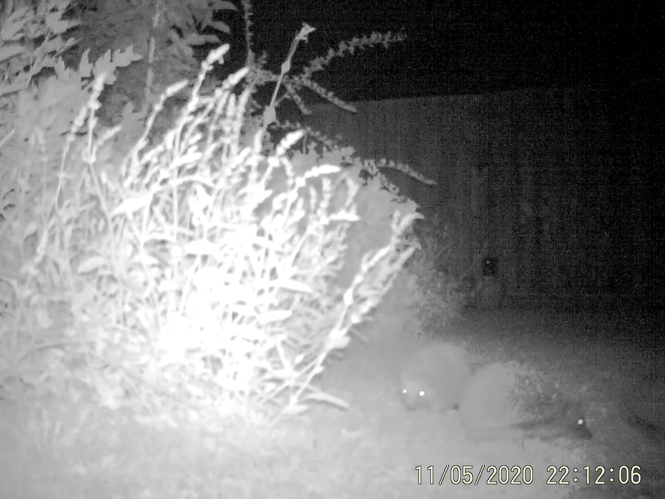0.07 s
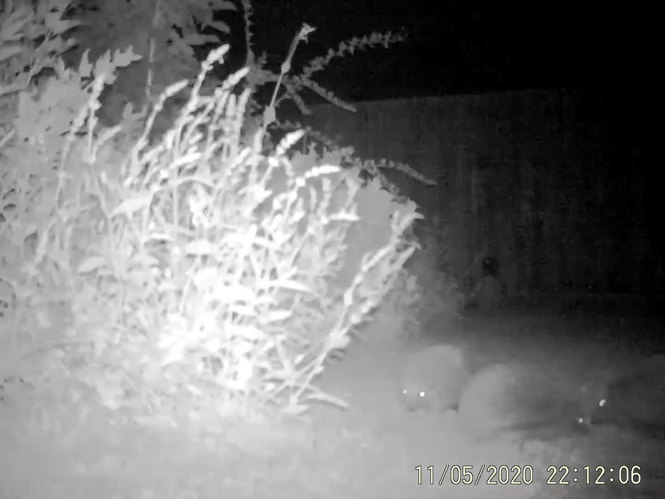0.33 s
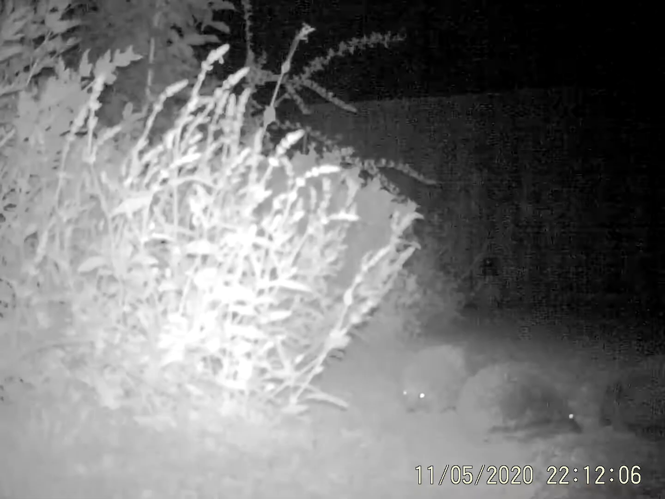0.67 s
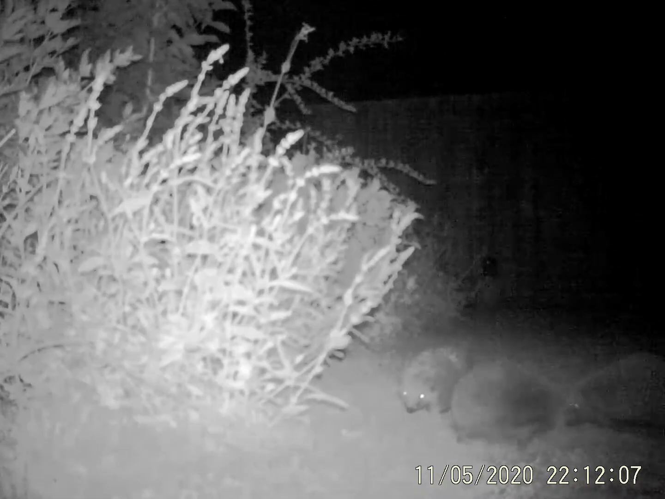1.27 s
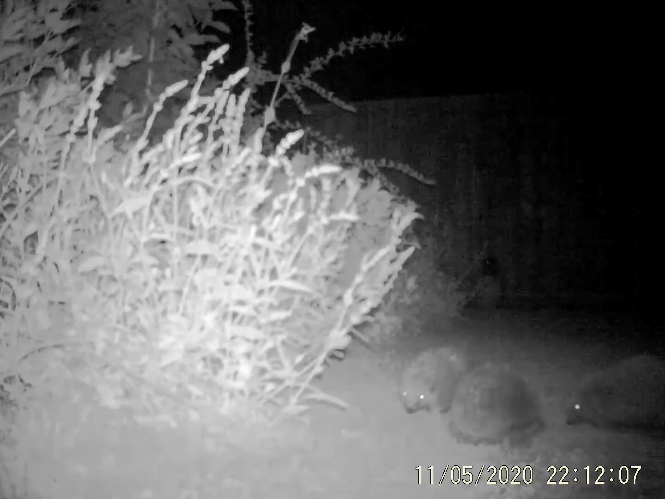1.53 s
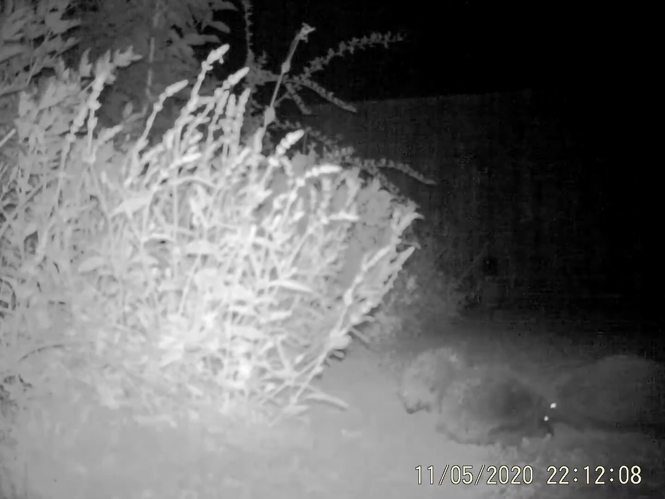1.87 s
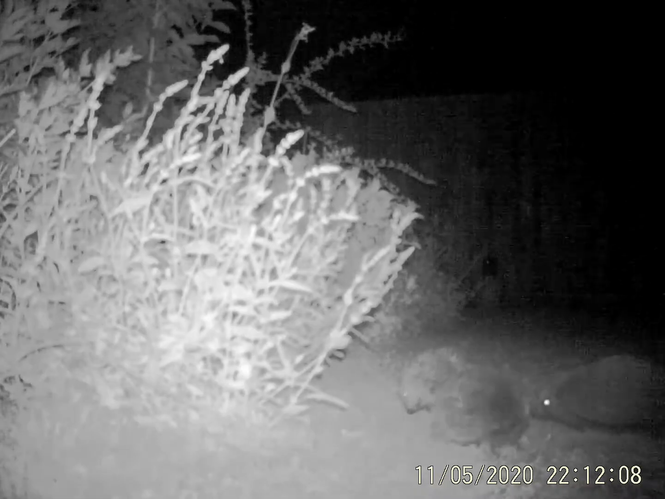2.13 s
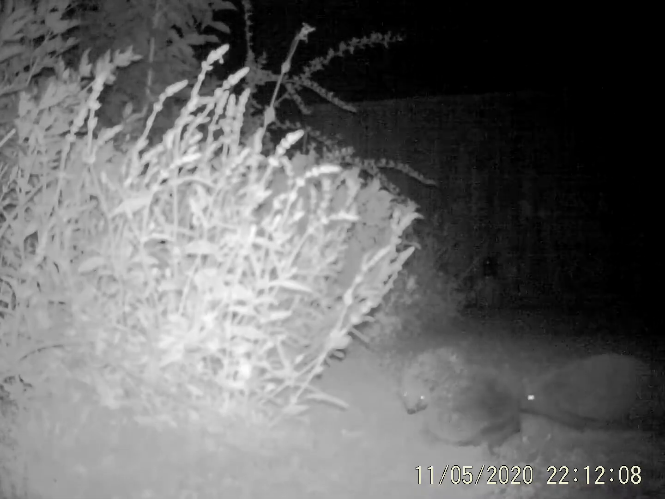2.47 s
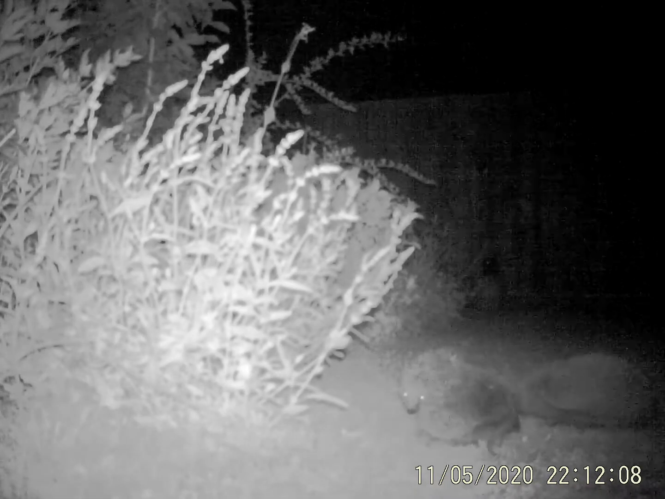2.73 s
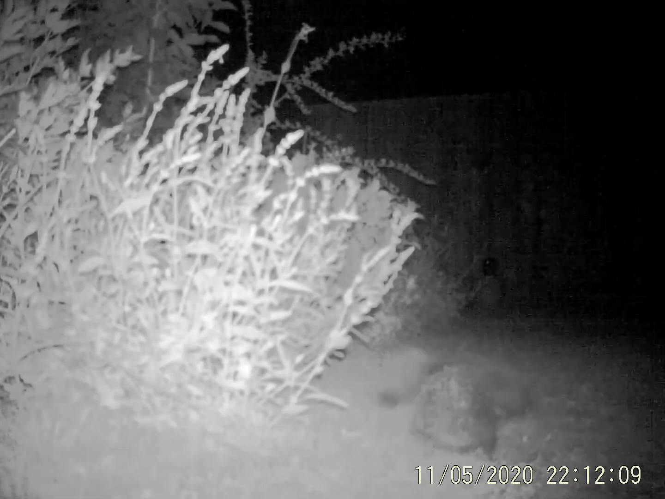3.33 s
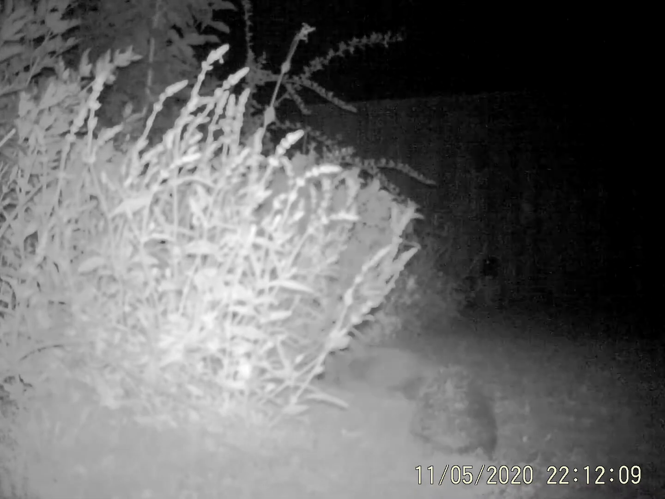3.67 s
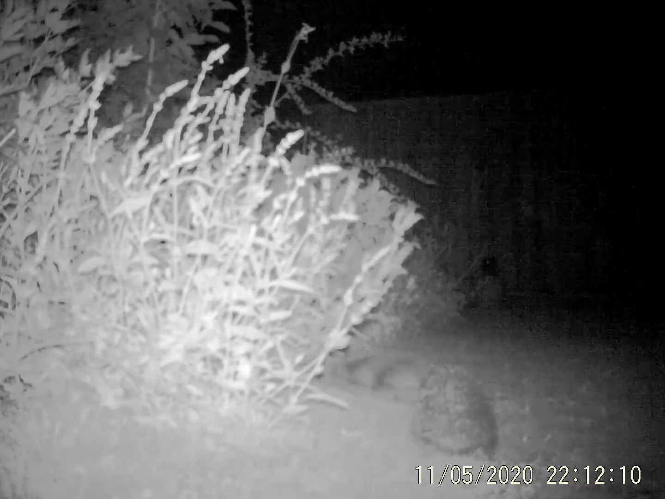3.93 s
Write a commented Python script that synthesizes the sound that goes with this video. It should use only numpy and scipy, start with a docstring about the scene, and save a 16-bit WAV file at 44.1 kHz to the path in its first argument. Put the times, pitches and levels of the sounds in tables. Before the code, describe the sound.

Soft, breathy hedgehog huffs repeat evenly in a night garden, a few metres from a microphone that starts with a pop and keeps hissing. Near the end the animals shuffle away with light scuffs and dull little steps.

```python
"""A pop, then steady hiss: a mono microphone switches on beside a garden path at night.
A few metres off, hedgehogs circle each other. One huffs about three times a second: turbulent air
excites its airway to a hollow puff and its nostrils to a thin hiss, at times with a whistle.
Then they shuffle off with faint scuffs and footfalls. Fence and paving return a short echo."""
import sys
import numpy as np
from scipy import signal
from scipy.fft import rfft, irfft, next_fast_len
from scipy.io import wavfile
from scipy.ndimage import map_coordinates

SR = 44100
rng = np.random.default_rng(int(sys.argv[2]) if len(sys.argv) > 2 else 0)


def persist_wave(psi):
    """Save psi, clipped to +-1, as 16-bit WAV."""
    counts = np.round(np.clip(psi, -1, 1) * 32767).astype(np.int16)
    wavfile.write(sys.argv[1], SR, np.atleast_2d(counts).T)


N = 176400

# Huffs: t/s, duration/s, puff level/dB, nasal level/dB, main resonance f/Hz, low-resonance gain/dB
HUFF_EVENTS = [(0.014, 0.083, -58, -65.5, 1000, -3), (0.251, 0.075, -55.5, -66.5, 930, 2),
               (0.573, 0.11, -58.5, -67.5, 1030, -5), (0.838, 0.074, -58.5, -63, 950, -2),
               (1.193, 0.096, -58, -67, 920, -2), (1.601, 0.092, -58.5, -66.5, 900, 2),
               (1.931, 0.098, -56.5, -67, 930, -3), (2.223, 0.1, -57, -71, 925, 1),
               (2.504, 0.064, -57.5, -66.5, 900, 4), (2.81, 0.096, -57.7, -68.5, 960, 2),
               (3.162, 0.094, -58, -68, 1020, -1)]
# Airway resonances: f/(main resonance f), bandwidth/Hz, relative level/dB
AIRWAY_MODES = [(.44, 169, 7.5), (.6, 200, -8), (.83, 220, 2.5), (1.04, 252, 6), (1.35, 400, -29)]
# Nostril resonances: f/Hz, bandwidth/Hz, relative level/dB
NOSTRIL_MODES = [(3200, 870, -5.5), (4100, 520, -8), (5160, 1100, -5.5), (6100, 1200, -6),
                 (8800, 3600, -18)]
# Nostril whistles: t/s, duration/s, level/dB, initial f/Hz, final f/Hz
WHISTLE_EVENTS = [(.61, .055, -71, 5190, 5290), (.865, .042, -72, 5220, 4970),
                  (1.645, 0.038, -70, 5000, 4900), (2.262, .054, -66.5, 5420, 5020),
                  (2.813, 0.046, -70, 5500, 5180), (2.87, 0.035, -70, 4520, 4350)]
# Paws landing on the path: t/s, level/dB
FOOTFALL_EVENTS = [(3.376, -56), (3.44, -59), (3.465, -50), (3.599, -49), (3.616, -47)]
# Modes of a paw's knock: mean f/Hz, relative level/dB, T60/s
KNOCK_MODES = [(230, -6, .03), (386, -8, .028), (566, -4, .025)]
# Feet scuffing the ground: t/s, duration/s, level/dB
SCUFF_EVENTS = [(1.506, 0.026, -61), (2.413, 0.026, -62), (3.332, .02, -66), (3.5, 0.023, -63),
                (3.563, 0.027, -63), (3.674, 0.023, -64)]
# Spectrum of scuffed ground: f/Hz, relative level/dB
GROUND_SPECTRUM = [(60, -21), (200, 11), (450, -3), (700, -1), (1100, -10), (2000, -14), (6000, -25),
                   (16000, -31)]
# Spectrum of dry leaves: f/Hz, relative level/dB
LEAF_SPECTRUM = [(500, -30), (2500, -10), (5200, 9), (8000, -8), (16000, -17)]
# Spectrum of the microphone's hiss: f/Hz, relative level/dB
HISS_SPECTRUM = [(20, 2.5), (50, 2.5), (120, 1.5), (250, -1), (500, -4), (1000, -6), (2000, -9),
                 (4000, -11.5), (8000, -13.5), (14500, -14), (15800, -20)]

PUFF_RISE_S, HUFF_FALL_S, NOSE_LAG_S, NOSE_RISE_S = .019, .036, .0059, .014
PUFF_LOW_HZ, PUFF_HIGH_HZ = 323, 1510
LOW_MODE_RATIO = .7  # airway resonances below this ratio swell in the deeper huffs
FLOW_SMOOTH_S = .014
WHISTLE_SPREAD_HZ, WHISTLE_EDGE_S = 290, .012
BRUSH_START_S, BRUSH_LENGTH_S, BRUSH_DB = 3.615, .05, -68
ECHO_T60_S, ECHO_DB = .14, -15
SWITCH_ON_S, HISS_DB, BAND_LIMIT_HZ = .0363, -56.5, 15800
BIAS, POP_SIZE, SETTLE_S, SWING_HZ = .0047, .019, .17, .33  # bias and pop relative to full scale


def huffs():
    """Source and filter: turbulent air excites the resonances of the airway, then of the nostrils."""
    out = np.zeros(N)
    for start, length, puff_db, nose_db, main_hz, depth_db in HUFF_EVENTS:
        modes = [(ratio * main_hz, width, db + depth_db * (ratio < LOW_MODE_RATIO))
                 for ratio, width, db in AIRWAY_MODES]
        puff = noise(lambda hz: resonances(hz, modes) * puff_band(hz))
        nose = noise(lambda hz: resonances(hz, NOSTRIL_MODES))
        puff_envelope = burst(start, length, PUFF_RISE_S, HUFF_FALL_S)
        nose_envelope = burst(start + NOSE_LAG_S, length - NOSE_LAG_S, NOSE_RISE_S, HUFF_FALL_S)
        out += amp(puff_db) * steady_flow(puff) * puff_envelope
        out += amp(nose_db) * nose * nose_envelope
    return out


def whistles():
    """Narrow-band resonance: a constricted nostril sings a breathy note that mostly sinks in pitch."""
    t, out = np.arange(N) / SR, np.zeros(N)
    gaussian = lambda hz: np.exp(-(hz / WHISTLE_SPREAD_HZ) ** 2 / 2)
    for start, length, db, start_hz, end_hz in WHISTLE_EVENTS:
        pitch_hz = np.interp(t, [start, start + length], [start_hz, end_hz])
        phase = 2 * np.pi * np.cumsum(pitch_hz) / SR
        band = noise(gaussian) * np.cos(phase) + noise(gaussian) * np.sin(phase)
        out += amp(db) * steady_flow(band) * burst(start, length, WHISTLE_EDGE_S, WHISTLE_EDGE_S)
    return out


def footfalls():
    """Impact excitation: each paw sets off heavily damped modes, heard as a dull knock."""
    out = np.zeros(N)
    for start, db in FOOTFALL_EVENTS:
        t = np.maximum(np.arange(N) / SR - start, 0)
        onset = 1 - np.exp(-t / .0012)
        for mean_hz, mode_db, t60 in KNOCK_MODES:
            hz = mean_hz * rng.normal(1, .084)
            decay = np.exp(-np.log(1000) * t / t60)
            out += amp(db + mode_db) * onset * decay * np.sin(2 * np.pi * hz * t)
    return out


def shuffling():
    """Friction noise: small feet scuff the ground, and a body brushes once past dry leaves."""
    scuffs = sum(amp(db) * burst(start, length, rise_s=.004, fall_s=.0088)
                 for start, length, db in SCUFF_EVENTS)
    brush = amp(BRUSH_DB) * burst(BRUSH_START_S, BRUSH_LENGTH_S, rise_s=.015, fall_s=.025)
    ground = grainy(coloured(GROUND_SPECTRUM), depth_db=2.3, rate_hz=270)
    leaves = grainy(coloured(LEAF_SPECTRUM), depth_db=3, rate_hz=400)
    return scuffs * ground + brush * leaves


def fence_echo(x):
    """Diffuse reflection: fence and paving return a tail that decays exponentially."""
    t = np.arange(SR // 3) / SR
    decay = np.exp(-np.log(1000) * t / ECHO_T60_S) * (t > .006)  # first arrival after 6 ms
    tail = rng.standard_normal(len(t)) * decay
    return signal.fftconvolve(x, tail / np.linalg.norm(tail))[:N]


def amp(db):
    """Amplitude ratio of a level in decibels."""
    return 10 ** (np.asarray(db) / 20)


def unit_rms(x):
    """Normalisation to unit mean power."""
    return x / np.sqrt(np.mean(x ** 2) + 1e-20)


def filtered(x, response):
    """Linear filtering: the spectrum is multiplied by a frequency response."""
    size = next_fast_len(N + SR // 2)
    return irfft(rfft(x, size) * response(np.fft.rfftfreq(size, 1 / SR)), size)[..., :N]


def noise(response):
    """Spectral shaping of white noise, at unit rms."""
    return unit_rms(filtered(rng.standard_normal(N), response))


def coloured(spectrum):
    """Noise whose spectral level is interpolated over log frequency."""
    f, db = np.transpose(spectrum)
    return noise(lambda hz: amp(np.interp(np.log(hz + 1), np.log(f + 1), db)))


def resonances(hz, modes):
    """Gain of second-order resonators whose powers add."""
    return np.sqrt(sum(amp(db) ** 2 * (hz * width) ** 2 / ((f ** 2 - hz ** 2) ** 2 + (hz * width) ** 2)
                       for f, width, db in modes))


def puff_band(hz):
    """Band-pass gain: 24 dB per octave below the puff's band, 12 above."""
    return 1 / np.sqrt((1 + (PUFF_LOW_HZ / (hz + 1)) ** 8) * (1 + (hz / PUFF_HIGH_HZ) ** 4))


def steady_flow(x):
    """Division by the running rms makes noise as even as a steady stream of air."""
    window = signal.windows.hann(int(2 * FLOW_SMOOTH_S * SR))
    power = signal.fftconvolve(x * x, window / window.sum(), "same")
    return x / np.sqrt(np.abs(power) + 1e-9)


def grainy(x, depth_db, rate_hz):
    """Random amplitude modulation roughens noise; the result has unit rms."""
    knots = rng.standard_normal(int(N * rate_hz / SR) + 4)
    flicker = map_coordinates(knots, [np.arange(N) * rate_hz / SR])
    return unit_rms(x * amp(depth_db * flicker))


def burst(start, length, rise_s, fall_s):
    """A plateau envelope; its sine edges reach rise_s and fall_s either side of its start and end."""
    t = np.arange(N) / SR
    edge = lambda u: .5 + .5 * np.sin(np.pi / 2 * np.clip(u, -1, 1))
    return edge((t - start) / rise_s) * edge((start + length - t) / fall_s)


def scene():
    """Superposition of the animals' direct sound and its echo, alike in both channels."""
    animals = huffs() + whistles() + shuffling() + footfalls()
    return np.tile(animals + amp(ECHO_DB) * fence_echo(animals), (2, 1))


def record(dry):
    """Step response: the microphone pops on and settles to its bias, adds hiss and limits the band."""
    t = np.arange(N) / SR - SWITCH_ON_S
    hiss = amp(HISS_DB) * coloured(HISS_SPECTRUM)
    pop = BIAS + POP_SIZE * np.exp(-t / SETTLE_S) * np.cos(2 * np.pi * SWING_HZ * t)
    return filtered((dry + hiss + pop) * (t >= 0), lambda hz: hz < BAND_LIMIT_HZ)


dry = scene()
out = record(dry)
persist_wave(out)
```